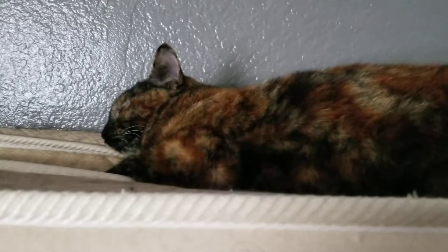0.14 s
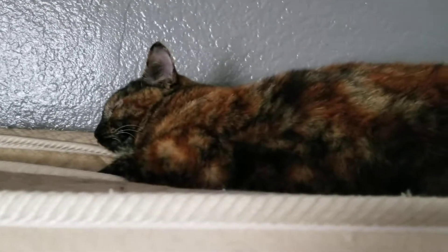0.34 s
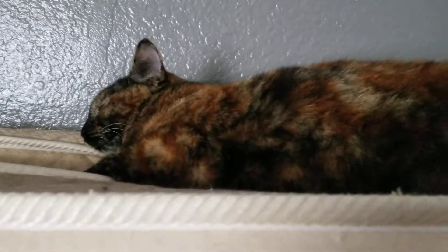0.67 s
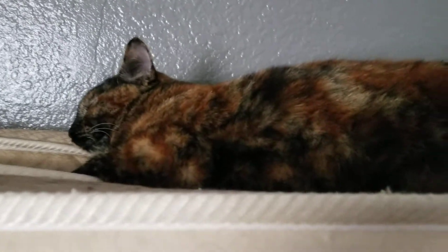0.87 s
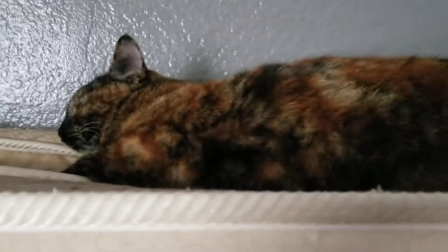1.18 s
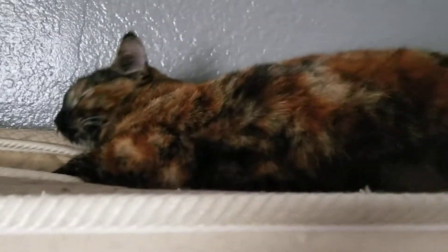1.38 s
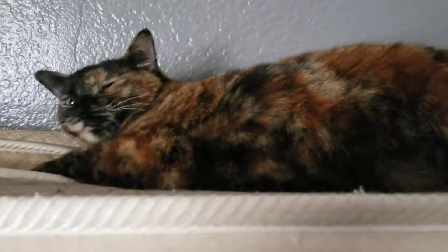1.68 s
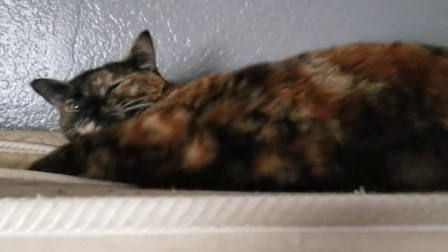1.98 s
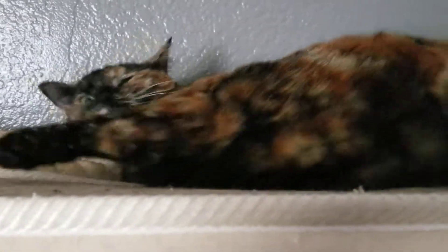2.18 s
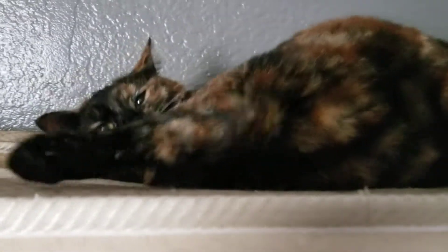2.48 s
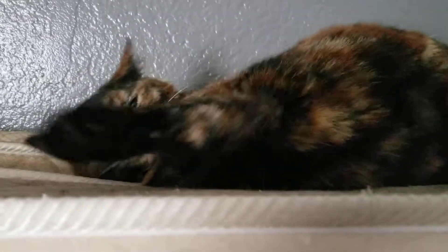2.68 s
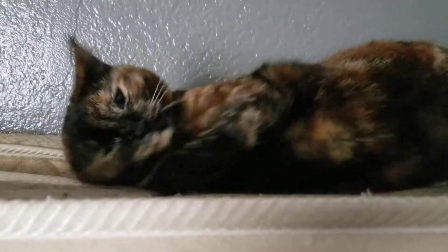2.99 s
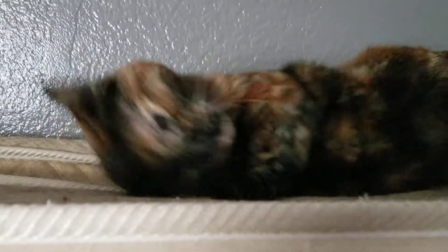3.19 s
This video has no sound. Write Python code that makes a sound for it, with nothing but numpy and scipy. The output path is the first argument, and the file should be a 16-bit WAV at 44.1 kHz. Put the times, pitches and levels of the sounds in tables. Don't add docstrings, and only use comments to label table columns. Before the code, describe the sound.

A cat gives one short closed-mouth rising trill in a quiet, softly humming room.

```python
import sys
import numpy as np
from scipy import signal
from scipy.fft import rfft, irfft, next_fast_len
from scipy.io import wavfile
from scipy.ndimage import uniform_filter1d, map_coordinates

SR = 44100
rng = np.random.default_rng(int(sys.argv[2]) if len(sys.argv) > 2 else 0)


def natural_amplitude(level_db):
    exponent = np.asarray(level_db, float) / 20
    return 10 ** exponent


def to_wav(s):
    ch = np.atleast_2d(s).T
    pcm = np.round(np.clip(ch, -1, 1) * 32767)
    wavfile.write(sys.argv[1], SR, pcm.astype(np.int16))


N = 147294


def unit(x):
    return x / np.sqrt(np.mean(x ** 2) + 1e-20)


def along(points, hz):
    f, v = np.transpose(points)
    return np.interp(np.log(hz + 1), np.log(f + 1), v)


def wobble(rate_hz):
    knots = rng.standard_normal(int(N * rate_hz / SR) + 4)
    return map_coordinates(knots, [np.arange(N) * rate_hz / SR])


def filtered(x, response):
    m = next_fast_len(N + 8192)
    return irfft(rfft(x, m) * response(np.fft.rfftfreq(m, 1 / SR)), m)[..., :N]


def peak(f, hz, width_hz):
    return 1j * f * width_hz / (hz * hz - f * f + 1j * f * width_hz)


def cat():
    # start_s, pitch_hz, effort_db, brightness_db_per_octave, flutter_depth (0-1)
    trill = [
        (1.295, 505, -63, 1, .6),
        (1.385, 540, -55, 2, 1),
        (1.465, 612, -49, 0, .65),
        (1.54, 626, -47, 1, .4),
        (1.585, 648, -52, 0, .3),
        (1.65, 690, -48, -2, .1),
        (1.72, 700, -48, -4, .08),
        (1.774, 695, -51, -2, .1),
        (1.789, 820, -57, 0, .2),
    ]
    t = np.arange(N) / SR
    start_s, *columns = np.transpose(trill)
    pitch_hz, effort_db, tilt_db, depth = [np.interp(t, start_s, c) for c in columns]
    fade_in = np.clip((t - start_s[0]) / .01, 0, 1)
    fade_out = np.clip((start_s[-1] + .004 - t) / .006, 0, 1)

    flutter_hz, top_s, rise_share = 25, 1.39, .3
    speed_up = 1 + 1.2 * np.maximum(t - 1.45, 0)
    turn = (flutter_hz * (t - top_s) * speed_up + 0.05 * wobble(30)) % 1
    saw = np.interp(turn, [0, 1 - rise_share, 1], [1, -1, 1])
    saw = uniform_filter1d(saw, 150)

    swing, jitter = 0.079, .008
    hz = pitch_hz * (1 + swing * depth * saw + jitter * (.4 + depth) * wobble(120))
    phase = 2 * np.pi * np.cumsum(hz) / SR
    choke = np.sqrt(np.maximum(depth - .1, 0)) * np.maximum(np.cos(4 * np.pi * turn + wobble(20)), 0) ** 2
    dip_db = 1 * depth * np.maximum(-saw, 0) ** 2
    level = fade_in * fade_out * natural_amplitude(effort_db - dip_db)

    voice = level * vocal_folds(hz, phase, tilt_db, choke) + nostrils(phase, level, depth)
    room_db = -15
    return at_ports(voice) + natural_amplitude(room_db) * room(voice)


def vocal_folds(hz, phase, tilt_db, choke):
    # pitch_hz, level_db
    throat = [(500, -1), (700, 0.5), (1250, 3), (1650, -1), (2000, -13.5), (2600, -16.5), (3300, -43.5),
              (5000, -51.5)]
    folds = 0
    for k in range(1, 7):
        palate = natural_amplitude(-16) * abs(peak(k * hz, 3900, 550)) ** 2
        tract = natural_amplitude(along(throat, k * hz)) + palate
        choke_db = 6 * np.sqrt(k / 2) * choke
        folds = folds + tract * natural_amplitude(5 - choke_db + tilt_db * np.log2(k)) * np.sin(k * phase)
    return folds


def nostrils(phase, level, depth):
    # pitch_hz, width_hz, level_db
    whistle = [(9300, 790, -29.5), (8500, 510, -43.5), (14800, 4000, -39)]
    buzz = sum(np.cos(k * phase) for k in range(11, 18))
    breath_db, gate = 10.5, 0.99
    breath = natural_amplitude(breath_db) * (1 + gate * np.cos(phase)) * rng.standard_normal(N)
    fluttering = np.arange(N) / SR > 1.38
    push_db = 5 * depth * fluttering + 2 * wobble(50)
    source = level * natural_amplitude(push_db) * (buzz + breath)
    return filtered(source, lambda f: sum(natural_amplitude(db) * peak(f, c, w) ** 2 for c, w, db in whistle))


def at_ports(x):
    # pitch_hz, left_lead_rad, left_over_right_db
    image = [(300, .1, -1.5), (620, 0.56, 2), (1270, 1.2, -1), (1710, 2.16, -1), (3680, 3.7, 11.5),
             (9900, 12, 4)]
    image_hz, lead_rad, pan_db = np.transpose(image)

    def ports(f):
        gain = natural_amplitude(np.outer([.5, -.5], np.interp(f, image_hz, pan_db)))
        return gain * np.exp(1j * np.outer([.5, -.5], np.interp(f, image_hz, lead_rad)))
    return filtered(x, ports)


def room(x):
    # pitch_hz, t60_s
    decay = [(300, 0.1), (2000, 0.75), (10000, 0.067)]
    hz, t, z = signal.stft(rng.standard_normal((2, SR // 2)), SR, nperseg=256)
    fade = natural_amplitude(-60 * t / along(decay, hz)[:, None])
    tail = signal.istft(z * fade, SR, nperseg=256)[1]
    tail = tail / np.linalg.norm(tail[0])
    delayed = np.pad(x, (300, 0))[None]
    return signal.fftconvolve(delayed, tail, axes=1)[:, :N]


def ticks():
    # start_s, peak_db, body_hz, crack_over_body_db
    knocks = [
        (.6199, -37, 1100, -3),
        (1.0826, -37, 1500, -14),
        (2.273, -54, 2200, -20),
        (3.313, -50, 2400, -20),
    ]
    # pitch_hz, width_hz, level_db
    case = [(3100, 1100, -5), (5600, 900, -21)]
    out, tails, t = np.zeros((2, N)), np.zeros(N), np.arange(200) / SR
    crack_t60_s, pan_db, room_db = .002, 8, -13
    far_port = round(.0001 * SR)
    for start_s, db, body_hz, crack_db in knocks:
        blow, crack = np.zeros((2, N))
        start = round(start_s * SR)
        blow[start] = 1
        crack[start:][:200] = natural_amplitude(-60 * t / crack_t60_s) * rng.standard_normal(200)

        def shell(f):
            ring = sum(natural_amplitude(g) * peak(f, c, w) for c, w, g in case)
            return (peak(f, body_hz, 600) - ring) / (1 + 1j * f / 3000)
        body = filtered(blow, shell)
        crack = filtered(crack, lambda f: peak(f, 11800, 9000) ** 4)
        snap = natural_amplitude(db) * (body / abs(body).max() + natural_amplitude(crack_db) * crack / abs(crack).max())
        out += [snap * natural_amplitude(pan_db / 2), -np.roll(snap, far_port) * natural_amplitude(-pan_db / 2)]
        tails += snap
    return out + natural_amplitude(room_db) * room(tails)


def fur():
    # centre_s, rise_s, fall_s, level_db, pitch_hz
    strokes = [
        (2.4, .1, .08, -62, 2500),
        (2.7, .15, .2, -67, 3000),
        (3.3, .2, .1, -67, 3000),
        (1.7, .5, .5, -70, 3000),
        (2.785, .015, .055, -75, 10500),
        (2.79, .015, .05, -71, 14800),
        (.64, .01, .05, -82, 10500),
    ]
    out, t = np.zeros((2, N)), np.arange(N) / SR
    for centre_s, rise_s, fall_s, db, hz in strokes:
        swell = np.exp(-((t - centre_s) / np.where(t < centre_s, rise_s, fall_s)) ** 2)
        grain = rng.standard_normal((2, N)) * natural_amplitude(1.3 * wobble(300))
        cloth = unit(filtered(grain, lambda f: peak(f, hz, 1700) ** 2))
        out += natural_amplitude(db) * swell * cloth * natural_amplitude([[1.5], [-1.5]])
    return out


def motors():
    # multiple, level_db (rms)
    first = [(1, -69), (2, -31.5), (4, -51.5), (6, -58.5)]
    # multiple, level_db (rms), in_step_s (when it meets the first motor's phase)
    second = [(1, -53.5, 0.53), (2, -50.5, 0.16)]
    first_hz, second_hz = 58.61, 55.86
    t, drift, slip = np.arange(N) / SR, .02 * wobble(2), .12 * wobble(3)
    lead_rad = np.array([[.5], [-.5]]) * .1
    sway_db, pan_db = .4, .2
    hum = 0
    for k, db in first:
        turn = k * (2 * np.pi * first_hz * t + drift)
        hum = hum + natural_amplitude(db + 2 + sway_db * wobble(3)) * np.cos(turn + lead_rad)
    for k, db, in_step_s in second:
        turn = k * (2 * np.pi * (second_hz * (t - in_step_s) + first_hz * in_step_s) + slip)
        hum = hum + natural_amplitude(db + 3.5 + 3 * sway_db * wobble(1.5)) * np.cos(turn)
    return hum * natural_amplitude([[pan_db / 2], [-pan_db / 2]])


def rush(spectrum, patchy_db):
    # pitch_hz, correlation (-1 to 1)
    alike = [(30, .94), (130, .96), (290, .81), (640, .43), (1410, -.3), (3100, .1), (6800, 0)]
    # pitch_hz, left_over_right_db
    lean = [(200, 0), (700, .5), (1300, 0), (2400, 2), (4400, 4), (8000, 1), (15000, 3)]
    z = signal.stft(rng.standard_normal((2, N + 512)), nperseg=512)[2]
    patches = uniform_filter1d(rng.standard_normal(z.shape[1:]), 6, 0)
    patches = unit(uniform_filter1d(patches, 14, 1))
    pair = signal.istft(z * natural_amplitude(patchy_db * patches), nperseg=512)[1][:, :N]

    def spread(hz):
        angle = np.arccos(np.clip(along(alike, hz), -1, 1)) / 2
        return natural_amplitude(along(spectrum, hz)) * [np.cos(angle), np.sin(angle)]
    mid, side = filtered(pair, spread)
    stereo = np.array([mid + side, mid - side])
    return unit(filtered(stereo, lambda hz: natural_amplitude(np.outer([.5, -.5], along(lean, hz)))))


def rumble():
    # pitch_hz, level_db_per_hz
    low_air = [(20, -13.5), (40, -1), (100, -2), (145, -8.5), (185, 1), (240, -5), (340, -6), (420, -15)]
    # pitch_hz, width_hz, level_db
    modes = [(186.4, 6.7, 0), (222.6, 20, 0.5), (282, 16, -7.5), (338.6, 8.3, 4)]
    low = rush([(10, -62.5)] + low_air + [(520, -58.5)], patchy_db=1.5)
    boom = filtered(low, lambda f: 1 + sum(natural_amplitude(db) * peak(f, c, w) for c, w, db in modes))
    return natural_amplitude(-44.5) * unit(boom)


def moving_air():
    # pitch_hz, level_db_per_hz
    draught = [(400, -6), (720, -8.5), (900, -12), (1400, -16), (2100, -19), (3700, -30), (5200, -42.5),
               (7800, -79)]
    return natural_amplitude(-50.5 + .5 * wobble(2.4)) * rush(draught + [(12000, -120)], patchy_db=0.72)


def microphone_hiss():
    # pitch_hz, level_db_per_hz
    bright = [(3240, -34), (5500, -15), (6470, -4), (7030, -9.5), (8270, -7.5), (12100, -1.5),
              (15700, -1.5)]
    return natural_amplitude(-73 + .6 * wobble(1.5)) * rush(bright, patchy_db=-1.6)


def scene():
    return cat() + ticks() + fur() + motors() + rumble() + moving_air() + microphone_hiss()


def band_limit(x):
    return signal.sosfilt(signal.butter(12, 16400, fs=SR, output="sos"), x)


def record(dry):
    shelf_hz, shelf_db, dim_until_s, top_hz = 14000, -6, 1.3, 15780
    top = filtered(dry, lambda f: np.clip((f - shelf_hz) / 500, 0, 1))
    held = (1 - natural_amplitude(shelf_db)) * (np.arange(N) < dim_until_s * SR)
    mix = filtered(dry - held * top, lambda f: f < top_hz)
    return band_limit(mix)


dry = scene()
out = record(dry)
to_wav(out)
```